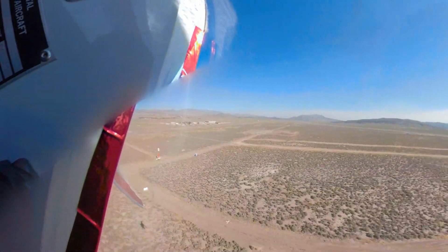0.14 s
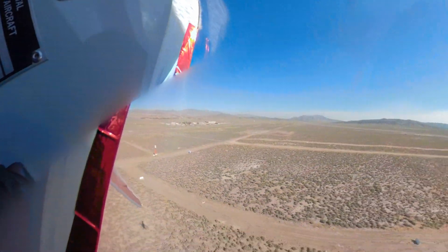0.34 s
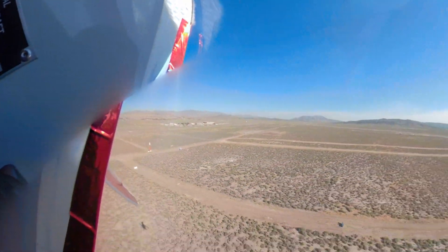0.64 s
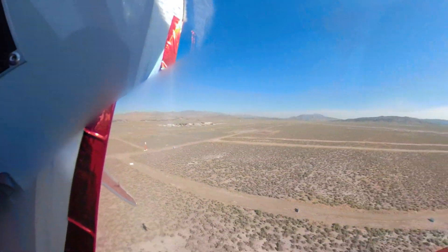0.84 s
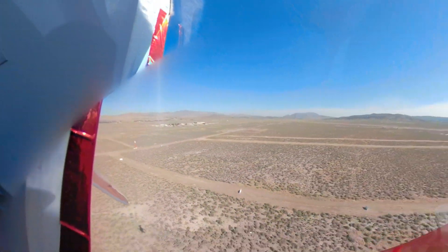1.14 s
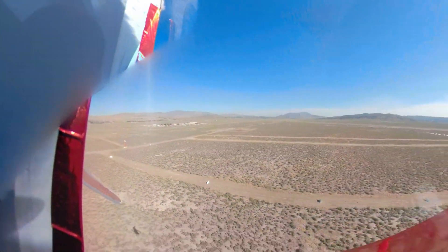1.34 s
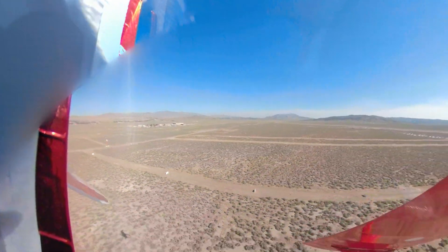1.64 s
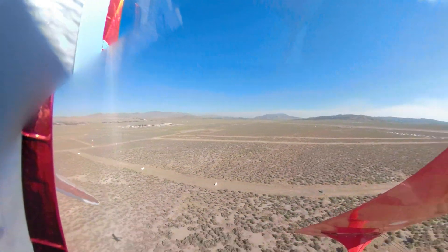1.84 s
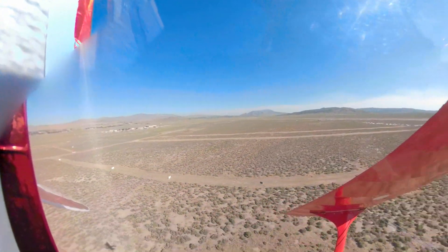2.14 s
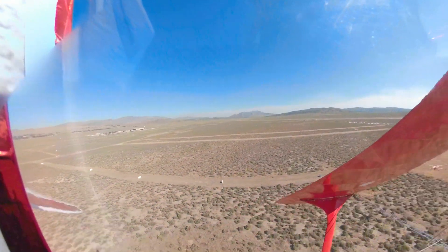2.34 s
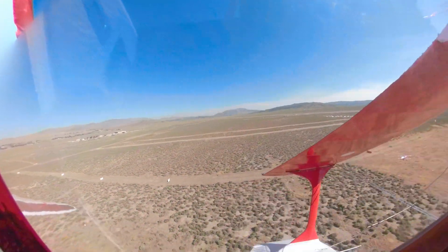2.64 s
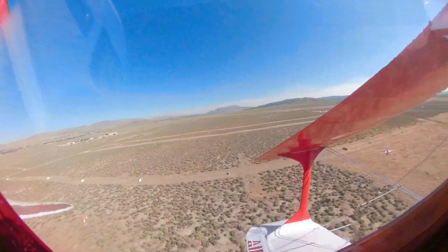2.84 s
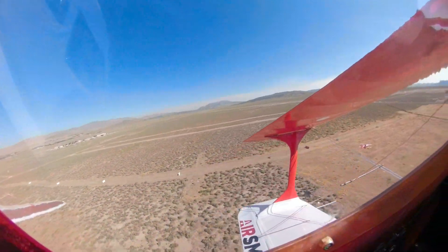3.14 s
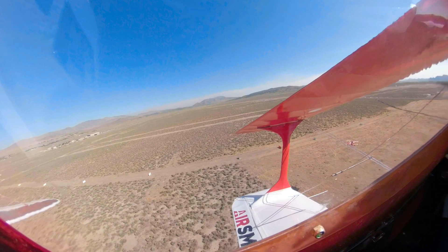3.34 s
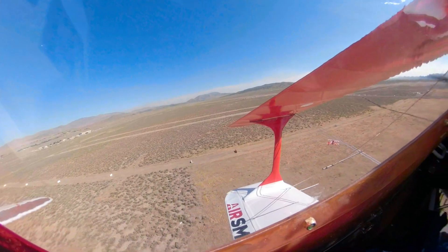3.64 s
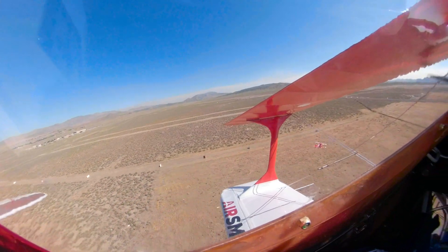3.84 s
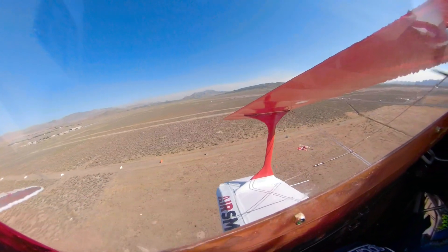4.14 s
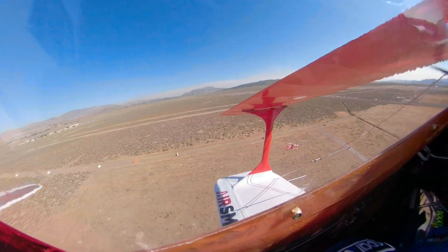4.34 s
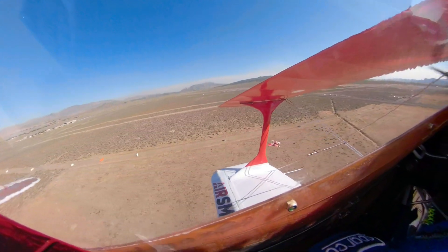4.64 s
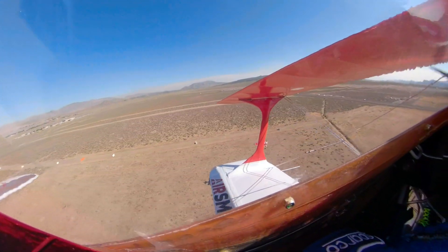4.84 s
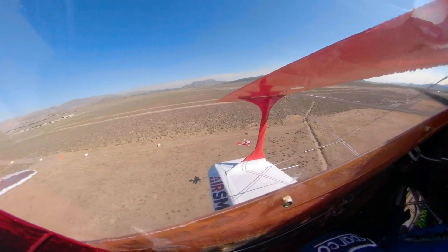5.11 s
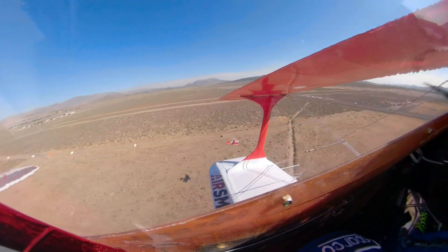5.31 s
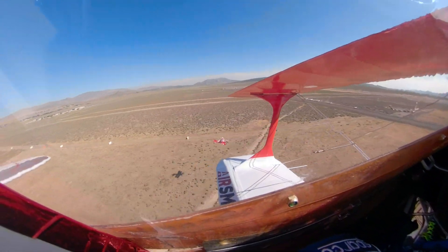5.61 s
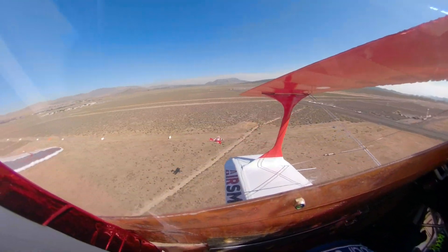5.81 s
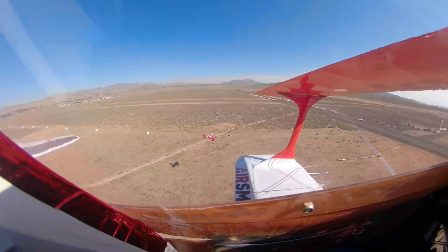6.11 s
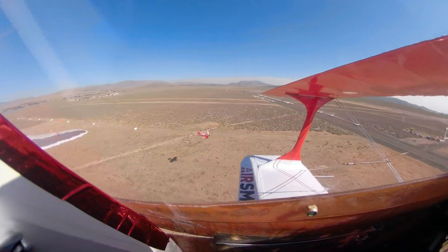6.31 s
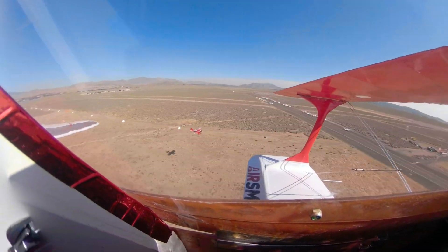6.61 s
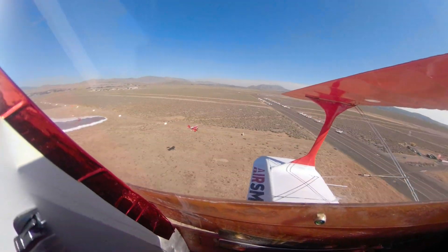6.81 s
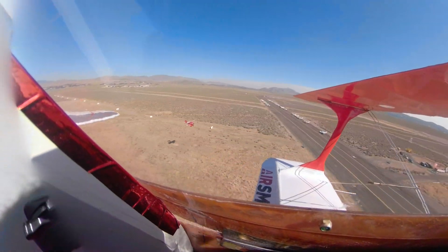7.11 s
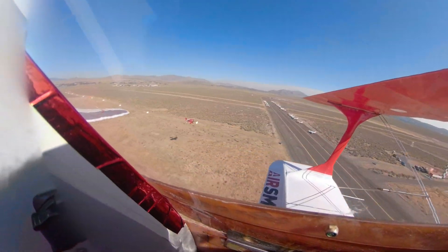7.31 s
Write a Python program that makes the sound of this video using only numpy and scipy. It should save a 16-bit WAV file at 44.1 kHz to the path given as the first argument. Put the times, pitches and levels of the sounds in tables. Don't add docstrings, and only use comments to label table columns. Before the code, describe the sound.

A small piston aircraft engine and propeller drone at high power in an open cockpit, with roaring propwash, hissing wind and a faint late whine.

```python
import sys
import numpy as np
from scipy import signal
from scipy.fft import rfft, irfft, next_fast_len
from scipy.io import wavfile
from scipy.ndimage import uniform_filter1d, minimum_filter1d

SR = 44100
rng = np.random.default_rng(int(sys.argv[2]) if len(sys.argv) > 2 else 0)


def gain_from_db(level_db):
    decades = np.asarray(level_db, float) / 20
    return 10 ** decades


def master(y):
    cut = np.clip(np.atleast_2d(y).T, -1, 1)
    pcm = np.round(cut * 32767)
    wavfile.write(sys.argv[1], SR, pcm.astype(np.int16))


N = 328986
TIME_S = np.arange(N) / SR


def rms_one(x):
    return x / np.sqrt(np.mean(x ** 2) + 1e-20)


def in_time(rows):
    times_s, values = np.transpose(rows)
    return np.interp(TIME_S, times_s, values)


def ramp(start_s, length_s):
    progress = np.clip((TIME_S - start_s) / length_s, 0, 1)
    return np.sin(np.pi / 2 * progress) ** 2


def drift(rate_hz):
    coarse, settle = 20, 4000
    pole = np.exp(-2 * np.pi * rate_hz * coarse / SR)
    noise = rng.standard_normal(N // coarse + settle + 2)
    slow = signal.lfilter([1], [1, -2 * pole, pole ** 2], noise)[settle:]
    return np.interp(np.arange(N) / coarse, np.arange(len(slow)), rms_one(slow - slow.mean()))


# f/Hz, width/Hz, level/dB
PANEL_RESONANCES = [(151.5, 39, 3.5), (271, 11, 3.5), (606, 26, 1.5), (910, 32, 0), (1795, 39, 1.5),
                    (1980, 27, 4), (2776, 80, 4.5), (3040, 67, 2), (3310, 29, -3)]


def turbulent_bands(spectrum, patchy_db, count, closed=True):
    size = next_fast_len(N)
    hz = np.arange(size // 2 + 1) * SR / size + 1
    points_hz, levels_db = np.transpose(spectrum)
    points = np.log(points_hz)
    above = -150 if closed else None
    colour_db = np.interp(np.log(hz), points, levels_db, left=-150, right=above)
    for centre, width, db in PANEL_RESONANCES:
        colour_db += db / (1 + (2 * (hz - centre) / width) ** 2)
    white = rng.standard_normal(N)
    tinted = rfft(white, size) * gain_from_db(colour_db) * np.sqrt(SR / 2)
    centres = np.linspace(points[0], points[-1], count)
    bands = []
    for centre, row in zip(centres, np.eye(count)):
        share = np.interp(np.log(hz), centres, row)
        band = irfft(tinted * share, size)[:N]
        bands.append((np.exp(centre), band * gain_from_db(patchy_db * drift(13.0))))
    return bands


def electric_motor():
    on_s, run_up_s, level_db = 1.407, 0.06, -48
    third_hz, overshoot_hz, settle_s = 2224, 4, 1.5
    running_s = np.maximum(TIME_S - on_s, 0)
    hz = third_hz + overshoot_hz * np.exp(-running_s / settle_s)
    turn = 2 * np.pi * np.cumsum(hz / 3) / SR
    whine = np.sin(3 * turn) + gain_from_db(-10.5) * np.sin(4 * turn)
    gain = ramp(on_s, run_up_s) * gain_from_db(level_db + 0.58 * drift(1.5))
    return np.sqrt(2) * gain * whine


# f/Hz, level/dB per Hz
HISS_SPECTRUM = [(3000, -79.5), (4400, -81.5), (4800, -73.5), (5300, -66.5), (5800, -70), (6500, -74.5),
                 (7600, -76), (8300, -85), (8900, -94), (10200, -97.5), (11000, -93), (12000, -86.5),
                 (13000, -91.5), (15200, -97.5)]
# t/s, level/dB
HOUSING_FLOW = [
    (0.1, -40),
    (0.44, -40.5),
    (0.85, -38.5),
    (1.85, -39),
    (3.41, -37),
    (3.57, -37.5),
    (5.31, -37),
    (5.47, -37.5),
    (7.35, -38),
]


def slipstream(cycle, speed_step):
    flow_db = in_time(HOUSING_FLOW)
    housing_db = flow_db - flow_db.mean()
    shoulder_db = 0.33 * housing_db + 0.5 * speed_step
    top_db = 0.3 * housing_db + 0.6 * speed_step
    bursts = drift(300.0)
    blade_chop_db = 0.3 * np.cos(4 * cycle + 1.1)
    gusts = gain_from_db(0.3 * drift(16.0) + blade_chop_db)
    out = np.zeros(N)
    for hz, band in turbulent_bands(HISS_SPECTRUM, patchy_db=0.55, count=10, closed=False):
        if hz < 6200:
            band_db = housing_db + 0.55 * bursts
        elif hz < 9000:
            band_db = shoulder_db + 0.55 * bursts
        else:
            band_db = top_db + 3.0 + 1.3 * bursts + 1.3 * drift(250.0)
        out += gain_from_db(band_db) * band
    return gain_from_db(-0.67) * gusts * out


# f/Hz, level/dB per Hz
WASH_SPECTRUM = [(20, -63), (35, -64), (48, -42.5), (80, -47), (125, -45), (240, -44), (330, -49.5),
                 (520, -52.0), (640, -56), (950, -58.5), (1300, -63), (2000, -67.5), (2500, -73.5),
                 (4400, -82.5)]


def propwash(cycle):
    swing_s, swing_length_s, swing_db = 2.6, 0.49, 5
    blade_chop = gain_from_db(0.36 * np.cos(4 * cycle + 1.8))
    buffet_db = swing_db * ramp(swing_s, swing_length_s)
    buffet_db -= buffet_db.mean()
    out = np.zeros(N)
    for hz, band in turbulent_bands(WASH_SPECTRUM, patchy_db=0.5, count=14):
        if hz < 70:
            band = band * gain_from_db(buffet_db + 1.8 * drift(2.7))
        elif hz > 400:
            band = band * blade_chop
        out += band
    return gain_from_db(0.08) * out


# multiple of the four-stroke cycle rate, level/dB
CYCLE_ORDERS = [(1, -48), (2, -36), (3, -33), (4, -15), (5, -36), (7, -35), (8, -14), (9, -31.5),
                (10, -34.5), (12, -30.5), (13, -41), (15, -42), (16, -30), (20, -34.5), (23, -45),
                (24, -47), (27, -44), (28, -39.5), (31, -45.5), (32, -39), (35, -48), (36, -47), (40, -49),
                (45, -53), (60, -56)]
# multiple of the cycle rate, slope/dB per 60 rpm
RESONANCE_SLOPES = [(2, -4), (9, 5.5), (12, -5), (16, -1.5), (20, -3), (31, -5.5), (28, 1)]
# t/s, level/dB
EXHAUST_THROB = [
    (0.15, -14.5),
    (1.17, -15.5),
    (1.36, -13.5),
    (3.18, -15),
    (3.49, -14),
    (5.15, -14),
    (5.45, -15),
    (5.98, -13.5),
    (7.2, -14),
    (7.3, -14),
]


def engine(cycle, speed_step):
    slopes = {round(order): slope for order, slope in RESONANCE_SLOPES}
    throb_db = in_time(EXHAUST_THROB)
    out = np.zeros(N)
    for order, level_db in CYCLE_ORDERS:
        firing = order in (4, 8, 12)
        start = np.pi if firing else rng.uniform(0, 2 * np.pi)
        if order == 4:
            level_db = -15.5 - 1.3 * speed_step - 0.2 * (throb_db - throb_db.mean())
        elif order == 8:
            level_db = throb_db + 0.085
        else:
            level_db = level_db + slopes.get(order, 0) * speed_step + 1.2 * drift(1.35)
        looseness = 0.0025 if firing else 0.006
        waver = looseness * order * drift(7.3)
        out += np.sqrt(2) * gain_from_db(level_db) * np.cos(order * cycle + start + waver)
    return out


# t/s, speed/rpm
CRANK_SPEED = [
    (0.1, 2944),
    (1.0, 2951),
    (1.8, 2953),
    (2.4, 2980),
    (3.3, 3002),
    (4.8, 3000),
    (5.4, 3011),
    (6.6, 3000),
    (7.36, 2998),
]


def scene():
    rpm = in_time(CRANK_SPEED)
    cycle = 2 * np.pi * np.cumsum(rpm / 120) / SR - 0.8
    speed_step = (rpm - 2985) / 60
    air = slipstream(cycle, speed_step) + propwash(cycle)
    return (electric_motor() + air + engine(cycle, speed_step))[None]


def band_limit(x):
    return signal.sosfilt(signal.butter(12, 15200, fs=SR, output="sos"), x)


def record(dry):
    ceiling, offset = 0.77, 0.001
    need = np.minimum(1, ceiling / (np.abs(dry) + 1e-9))
    held = minimum_filter1d(need, size=301)
    gain = uniform_filter1d(uniform_filter1d(held, size=151), size=151)
    return band_limit(gain * dry + offset)


dry = scene()
out = record(dry)
master(out)
```